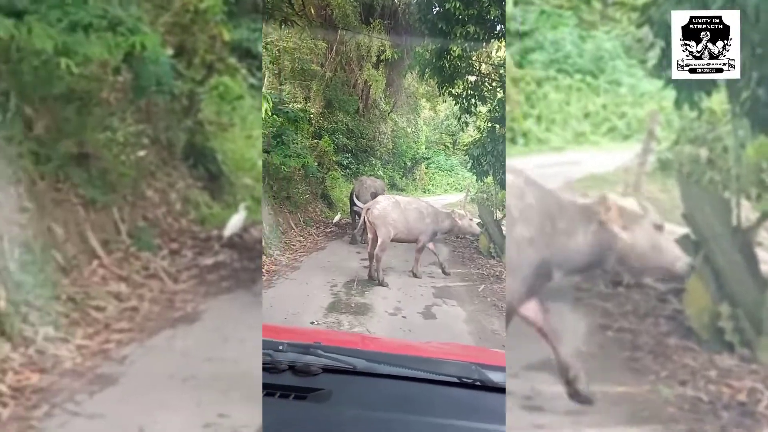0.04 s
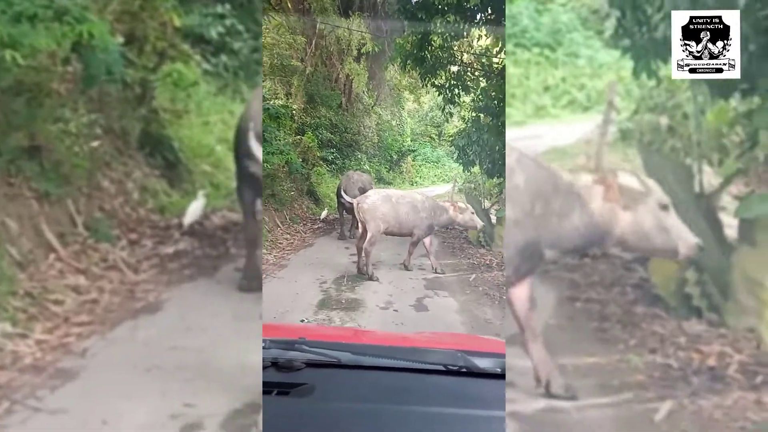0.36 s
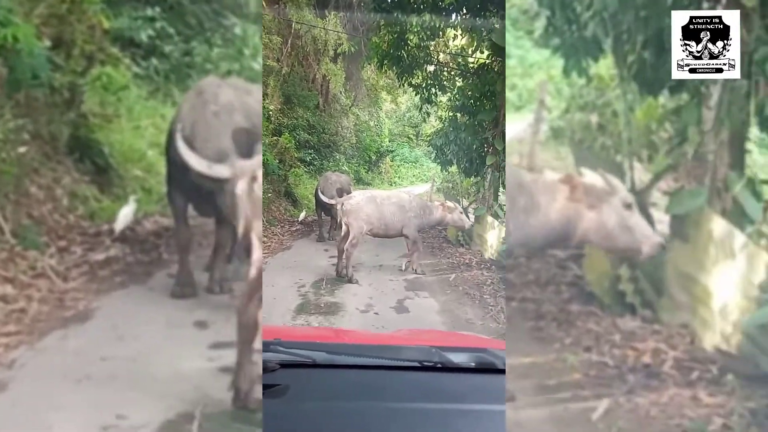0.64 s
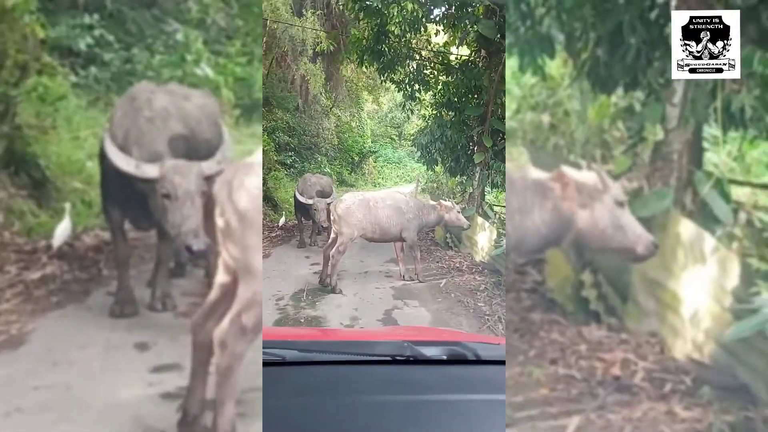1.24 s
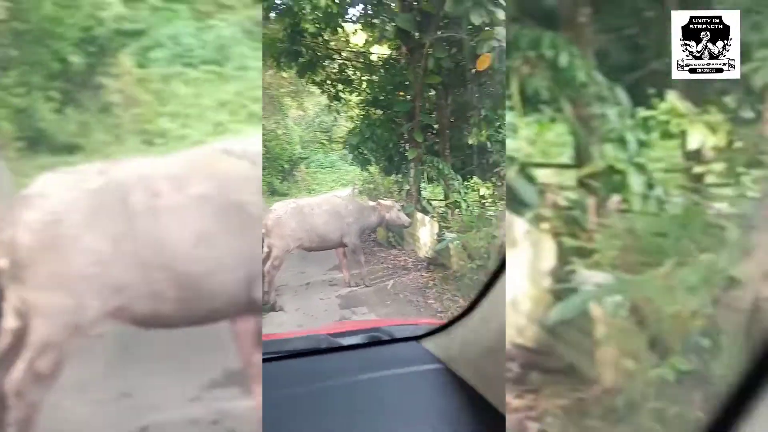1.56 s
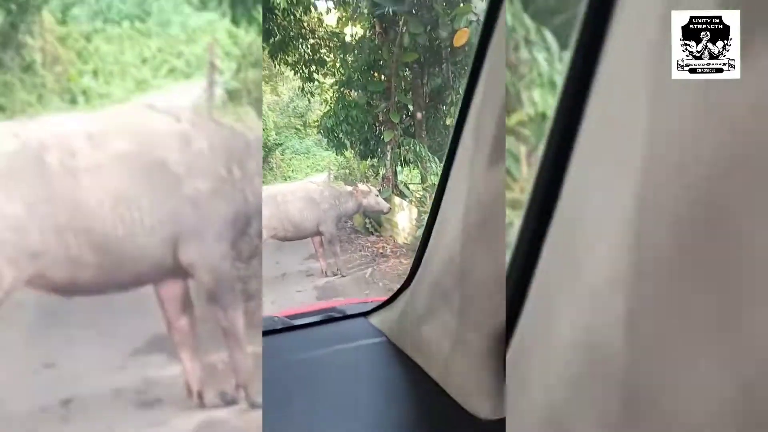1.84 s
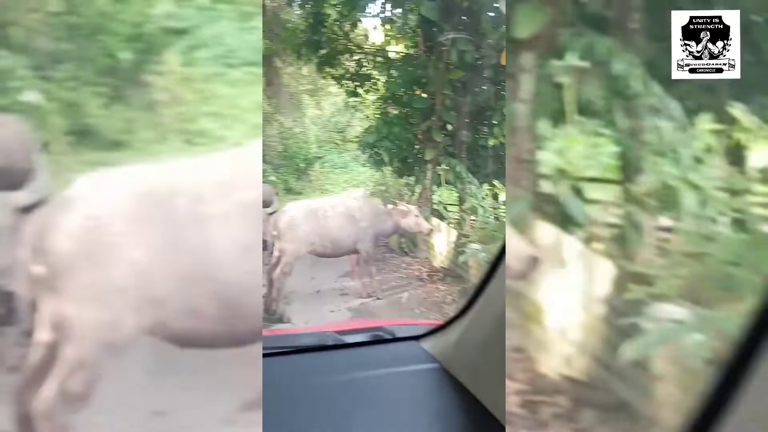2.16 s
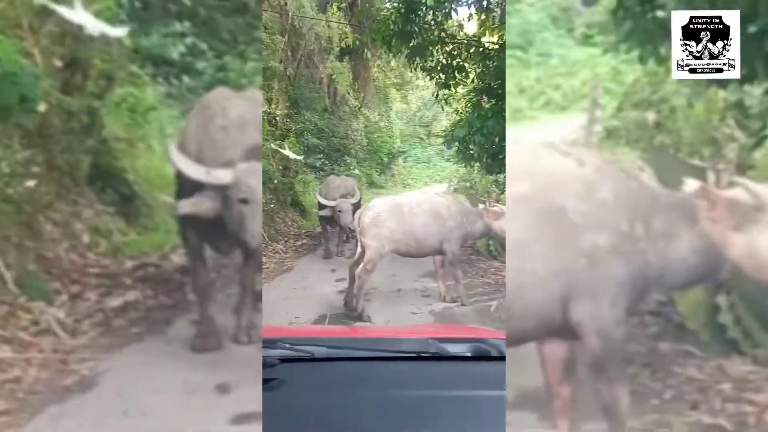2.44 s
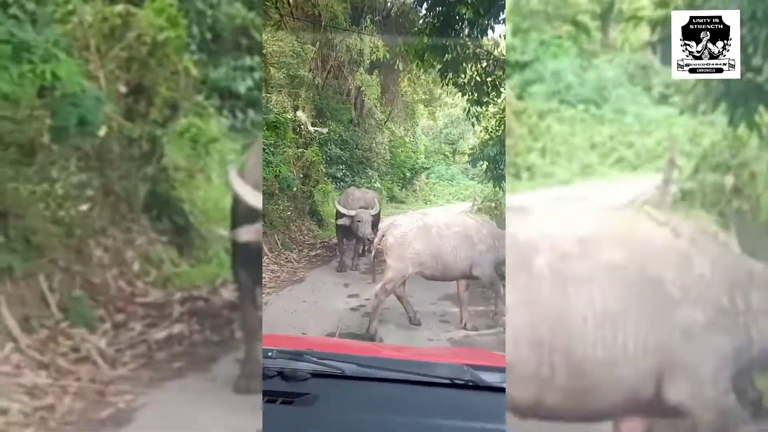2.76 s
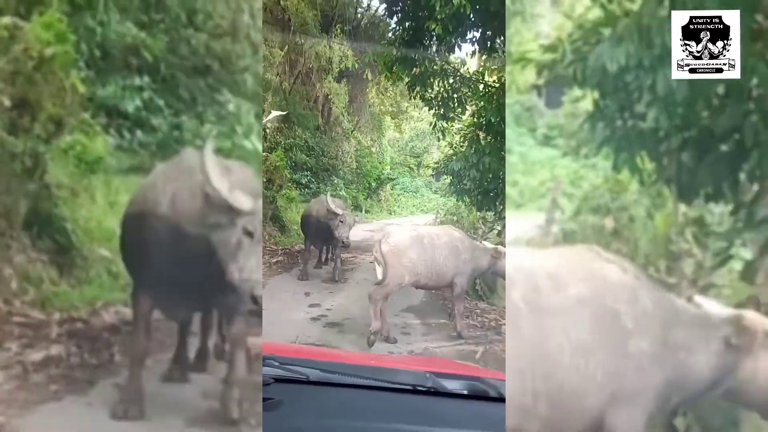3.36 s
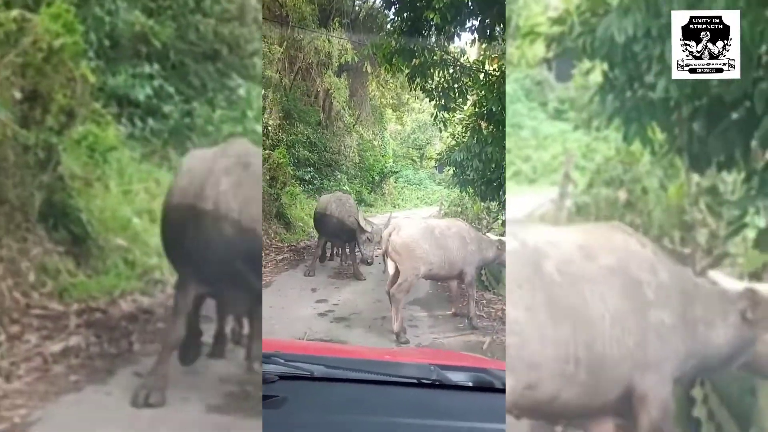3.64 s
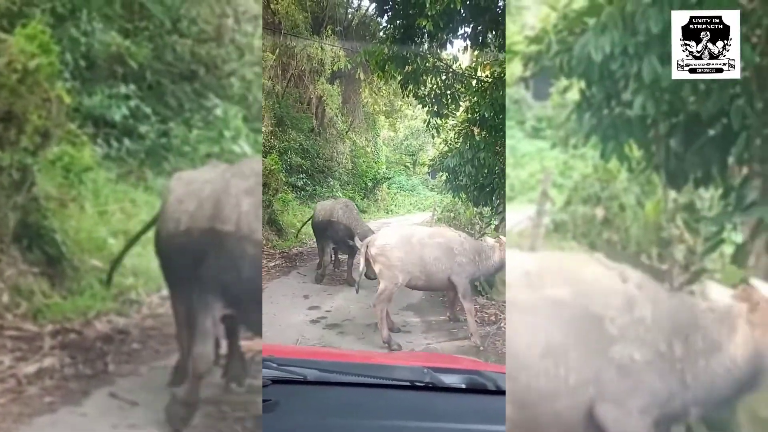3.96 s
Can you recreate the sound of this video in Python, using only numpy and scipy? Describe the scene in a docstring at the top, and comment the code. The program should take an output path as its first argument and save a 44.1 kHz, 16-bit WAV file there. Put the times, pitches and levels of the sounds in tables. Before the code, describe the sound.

Low engine rumble inside a slowly moving car, with rushing air and a few dull thuds.

```python
"""A car's engine hums low, heard from inside as it creeps along a village road; the cabin booms with it.
Air rushes through the dashboard vents and brightens while the microphone is turned aside.
Soft bumps shake the body: a few faint ones early, then a stronger one and a short run near the end.
A thin whistle, ticks of plastic trim and the rustle of a hand and sleeve come and go."""
import sys
import numpy as np
from scipy import signal
from scipy.fft import rfft, irfft
from scipy.io import wavfile
from scipy.ndimage import uniform_filter1d

SR = 44100
rng = np.random.default_rng(int(sys.argv[2]) if len(sys.argv) > 2 else 0)


def unload_wav(signal):
    """Save mono or channel-first audio to the path in sys.argv[1] as 16-bit WAV at rate SR, clipped to [-1, 1]."""
    wavfile.write(
        sys.argv[1],
        SR,
        np.round(np.clip(np.atleast_2d(signal).T, -1, 1) * 32767).astype(np.int16),
    )


N = 176400
T, HZ = np.arange(N) / SR, np.fft.rfftfreq(N, 1 / SR)

# how fast the engine runs (time [s], cycle rate [Hz])
ENGINE_SPEED = [(0, 22.77), (1.5, 22.12), (3, 21.99), (4, 21.98)]
# tones in the hum (multiple of the cycle rate, relative level [dB])
ENGINE_TONES = [(2, -61), (3, -55.5), (4, -47.5), (6, -55), (9, -50)]
# how the hum rises and falls (time [s], gain [dB])
ENGINE_GAIN = [(0, -10), (.8, 4), (1.4, -3), (2.2, -1), (3.0, 2), (4, 7.5)]
# the rumble's colour: how strong its lows and highs are (frequency [Hz], relative level [dB])
RUMBLE_COLOUR = [(20, -33), (33, -30.5), (45, -18), (70, -22), (100, -3.5), (125, 1), (160, -1.5),
                 (225, -2.5), (310, -10.5), (450, -24.5), (900, -55.5), (3000, -110)]
# pitches at which the cabin air booms (frequency [Hz], width [Hz], boost [dB])
CABIN_BOOMS = [(131, 30, 2), (191.7, 24, 3.5), (246, 27, 3.5)]
# loudness of the rumble (time [s], level [dB])
RUMBLE_LEVEL = [(0, -33), (.28, -37), (.46, -38.5), (.75, -35), (1.2, -38.5), (2.1, -38), (2.8, -37.5),
                (3.1, -36), (3.25, -34.5), (3.4, -37), (3.72, -36.5), (3.82, -29.5), (4, -28)]
# one narrow boom that drones (frequency [Hz], relative level [dB])
DRONE_COLOUR = [(120, -58.5), (178, -13), (195, 1.5), (208, -9), (300, -63.5), (1000, -140)]
# loudness of the drone (time [s], level [dB])
DRONE_LEVEL = [(0, -50.5), (.25, -35), (.45, -53.5), (.75, -40), (1.0, -38.5), (1.2, -49), (1.4, -38),
               (2.0, -45.5), (2.25, -42.5), (2.7, -48), (3.1, -48), (4, -41.5)]
# vent air (frequency [Hz], relative level facing ahead [dB], relative level turned aside [dB])
AIR_COLOUR = [(100, -13.5, -22), (326, -6, 7), (442, 0.5, 0), (523, -1.5, -0.5), (725, -0.5, 5),
              (833, -7, -5), (1400, -8.5, -9.5), (2000, -11.5, -8), (2630, -13, -7), (2990, -12.5, -7.5),
              (3715, -14.5, -10), (4605, -23.5, -15), (4790, -26.5, -31), (5060, -49.5, -40),
              (5200, -45, -41), (5440, -52, -42.5), (8000, -75, -67)]
# where the ducts ring (frequency [Hz], width [Hz], boost facing ahead [dB], boost turned aside [dB])
DUCT_RINGS = [(558, 18, -5, 0), (602.6, 77, 7.5, 1.5), (676.4, 56, 6, 3), (952, 84, 4, 0.5),
              (1145, 47, 5, 4.5), (1556, 65, 11, 6.5), (1716, 74, 3.5, 10.5), (1877, 23, 5, 7),
              (2200, 160, 6.5, 1.5), (2753, 56, -0.5, 5), (2900, 62, 3.5, 3.5), (3264, 120, -8, -1),
              (3315, 90, 5.5, -9), (4136, 110, 5.5, -6), (4195, 130, -6.5, -8)]
# how far the microphone is turned aside (time [s], share [0-1])
MIC_TURN = [(0, 0.05), (.4, 0.03), (.8, 0.1), (1.3, 0.14), (1.55, 0.52), (1.8, 0.97), (2.1, 0.7),
            (2.35, 0.5), (2.55, 0), (4, 0)]
# loudness of the whistle (time [s], level [dB])
WHISTLE_LEVEL = [(0, -78), (.4, -73), (.75, -82), (1.2, -72), (2.1, -82), (2.75, -77.5), (3.3, -76),
                 (3.6, -80.5), (4, -80)]
# the body's deep shudder (frequency [Hz], relative level [dB])
SHUDDER_COLOUR = [(20, -21), (33, 5.5), (48, -10), (66, 12.5), (100, 10.5), (150, -3), (300, -19.5),
                  (700, -69), (2500, -120)]
# loudness of the shudder (time [s], level [dB])
SHUDDER_LEVEL = [(0, -47), (.45, -52), (.8, -50), (1.2, -58.5), (2.6, -63), (2.95, -53), (3.15, -46),
                 (3.22, -41), (3.3, -46), (3.45, -52), (3.74, -48), (3.8, -36), (3.92, -36), (4, -37)]
# rubbing cloth (frequency [Hz], relative level [dB])
SLEEVE_COLOUR = [(500, -27.5), (1100, -3), (1400, 1.5), (2000, -3.5), (2900, 0), (3700, 0.5), (4600, -8),
                 (5100, -24.5), (7000, -48.5)]
# loudness of the rubbing, before its flutter (time [s], level [dB])
SLEEVE_LEVEL = [(0, -75), (1.0, -61), (1.45, -63), (1.6, -55), (1.85, -49), (2.05, -57), (2.25, -47.5),
                (2.33, -60), (2.6, -75.5), (4, -74.5)]
# shifts of the hand (start [s], peak level [dB], rise time [s])
GRIP_RUSTLES = [(.108, -72, .012), (1.655, -76, .02), (1.792, -64.5, 0.013), (2.125, -70, 0.021),
                (2.238, -66, .011), (3.305, -72, .012), (3.885, -73, 0.014)]
# the hand's rustle (frequency [Hz], relative level [dB])
GRIP_COLOUR = [(3000, -13), (5500, 5), (8000, -12.5), (10300, 1.5), (12500, -0.5), (15000, 0)]
# soft bumps (start [s], peak level [dB], rough pitch [Hz], rise time [s])
SOFT_BUMPS = [(.203, -29, 228.5, 0.016), (0.789, -27, 132, 0.0098), (.934, -29.5, 192, 0.0076),
              (3.165, -24, 265, 0.0098), (3.176, -18, 136, 0.011), (3.203, -26, 183, 0.015),
              (3.403, -31, 170, 0.0053), (3.775, -19, 116.4, 0.012), (3.806, -16, 169, 0.0064),
              (3.824, -19.5, 286.7, 0.01), (3.865, -17.5, 98, 0.013), (3.911, -17.5, 97, 0.013),
              (3.950, -20, 108, 0.0099)]
# ticks of the trim (start [s], peak level [dB], rise time [s])
TRIM_TICKS = [(1.798, -42, 0.0022), (2.248, -47, 0.001), (3.308, -48, 0.003)]
# the ring of the plastic (frequency [Hz], relative level [dB])
TICK_COLOUR = [(300, -19), (1400, -3), (3300, -1), (4050, 10.5), (4700, 3), (5400, -12), (8000, -38),
               (11000, -31), (15000, -30)]
# drumming panels (frequency [Hz], relative level [dB])
PANEL_COLOUR = [(50, -50), (130, -4.5), (200, -1.5), (260, -1), (300, 2.5), (330, -9), (370, -19.5),
                (600, -17), (900, -44.5), (2500, -110)]
# loudness of the drumming (time [s], level [dB])
PANEL_LEVEL = [(0, -82), (3.15, -71), (3.172, -30.5), (3.195, -26.5), (3.24, -59), (3.74, -64), (3.78, -29),
               (3.83, -26), (3.89, -30.5), (3.93, -35), (4, -42)]
# microphone hiss (frequency [Hz], relative level [dB])
HISS_COLOUR = [(1000, 0), (5000, 1), (6400, 6), (7500, 1.5), (9000, -2.5), (11000, -0.5), (13000, 4),
               (15500, 2)]
# loudness of the hiss (time [s], level [dB])
HISS_LEVEL = [(0, -73), (1.5, -75), (2.9, -75), (3.3, -76), (4, -76)]


def amp(db):
    """Turns decibels into a number to multiply by."""
    return 10 ** (np.asarray(db) / 20)


def unit(x):
    """Scales a signal to an average strength (rms) of 1."""
    return x / np.sqrt(np.mean(x ** 2) + 1e-20)


def curve(points):
    """Joins (time, value) points with straight lines."""
    return np.interp(T, *np.transpose(points))


def colour(points, column=1):
    """Joins a colour table's points into a level in dB for every frequency."""
    table = np.array(points, float)
    return np.interp(np.log(HZ + 1), np.log(table[:, 0]), table[:, column])


def boosts(rows, column=2):
    """Bell-shaped peaks or dips, in dB, to add to a colour."""
    return sum(row[column] * 2 ** -((2 * (HZ - row[0]) / row[1]) ** 2) for row in rows)


def noise(colour_db):
    """Noise of strength 1 with the given colour."""
    return unit(irfft(rfft(rng.standard_normal(N)) * amp(colour_db), N))


def drift(rate_hz):
    """A random wander of strength 1; a higher rate wanders faster."""
    return unit(irfft(rfft(rng.standard_normal(N)) * np.exp(-(HZ / rate_hz) ** 2), N))


def swell(start, rise):
    """A loudness shape that reaches 1 after its rise time, then dies away."""
    age = np.maximum(T - start, 0) / rise
    return age * np.exp(1 - age)


def engine():
    """A slightly unsteady engine hums in a few low tones, each throbbing by itself."""
    speed = curve(ENGINE_SPEED) * (1 + 0.0088 * drift(rate_hz=2.6))
    cycles = np.cumsum(speed) / SR
    hum = 0
    for multiple, db in ENGINE_TONES:
        throb = amp(4.5 * drift(rate_hz=6.2))
        tone = np.sin(2 * np.pi * (multiple * cycles + rng.random()))
        hum += amp(db) * unit(throb * tone)
    return amp(curve(ENGINE_GAIN)) * hum


def cabin():
    """Engine and tyres shake the cabin air, which booms at a few pitches; one drones in swells."""
    rumble = amp(curve(RUMBLE_LEVEL)) * noise(colour(RUMBLE_COLOUR) + boosts(CABIN_BOOMS))
    drone = amp(curve(DRONE_LEVEL)) * noise(colour(DRONE_COLOUR))
    return rumble + drone


def reflections(depth_db=2, spacing_hz=41):
    """Sound bouncing off glass and trim leaves fine peaks and dips, in dB, in the air's colour."""
    jagged = rng.standard_normal(len(HZ))
    return depth_db * unit(uniform_filter1d(jagged, round(spacing_hz / HZ[1])))


def vents():
    """Air rushes through ringing ducts; its colour depends on where the microphone points."""
    ahead = amp(-39) * noise(colour(AIR_COLOUR) + boosts(DUCT_RINGS) + reflections())
    aside = amp(-39.5) * noise(colour(AIR_COLOUR, column=2) + boosts(DUCT_RINGS, column=3) + reflections())
    turn = curve(MIC_TURN)
    flutter = amp(0.79 * drift(rate_hz=18.4))
    return (np.sqrt(1 - turn) * ahead + np.sqrt(turn) * aside) * flutter


def whistle(pitch_hz=5213, width_hz=43):
    """A thin, rough whistle comes and goes above the rush of air."""
    fuzz = drift(width_hz) + 1j * drift(width_hz)  # blurs both loudness and pitch
    tone = (fuzz * np.exp(2j * np.pi * pitch_hz * T)).real
    flicker = 1 + .7 * np.tanh(2 * drift(rate_hz=10))
    return amp(curve(WHISTLE_LEVEL)) * unit(tone * flicker)


def shudder():
    """The car's body gives a deep shudder, strongest after the bumps."""
    return amp(curve(SHUDDER_LEVEL)) * noise(colour(SHUDDER_COLOUR))


def sleeve():
    """A sleeve rubs unevenly as the arm turns."""
    flutter_db = 3 * drift(rate_hz=38)
    return amp(curve(SLEEVE_LEVEL) + flutter_db) * noise(colour(SLEEVE_COLOUR))


def grip():
    """A hand shifts its grip with light, grainy rustles."""
    grains = unit(amp(2 * drift(rate_hz=600)) * noise(colour(GRIP_COLOUR)))
    return sum(amp(db) * swell(start, rise) for start, db, rise in GRIP_RUSTLES) * grains


def bumps(sag=0.093, roughness=0.14, rough_hz=58):
    """Each bump shakes the body for a few rough cycles that sag in pitch."""
    thuds = 0
    for start, db, hz, rise in SOFT_BUMPS:
        age = np.maximum(T - start, 0) / rise
        pitch = hz * (1 + sag * (2 * np.exp(-age) - .5))
        cycles = np.cumsum(pitch * (age > 0)) / SR
        fuzz = roughness * (drift(rough_hz) + 1j * drift(rough_hz))
        tone = ((1 + fuzz) * np.exp(2j * np.pi * cycles)).imag
        thuds += amp(db) * swell(start, rise) ** 2 * tone
    return thuds


def ticks():
    """Plastic trim gives small dry ticks, each with a short ring."""
    loudness = sum(amp(db) * swell(start, rise) for start, db, rise in TRIM_TICKS)
    return loudness * noise(colour(TICK_COLOUR))


def panels():
    """The late bumps set the car's panels drumming."""
    return amp(curve(PANEL_LEVEL)) * noise(colour(PANEL_COLOUR))


def scene():
    """Everything heard from the front seat, in one channel."""
    background = engine() + cabin() + vents() + whistle() + shudder()
    return (background + sleeve() + grip() + bumps() + ticks() + panels())[None]


def record(dry, cutoff_hz=15500):
    """The microphone adds a faint hiss, and the very highest treble is cut off."""
    hiss = amp(curve(HISS_LEVEL)) * noise(colour(HISS_COLOUR))
    treble_cut = signal.firwin(511, cutoff_hz, window=("kaiser", 9), fs=SR)
    return signal.oaconvolve(dry + hiss, treble_cut[None], "same")


dry = scene()
out = record(dry)
unload_wav(out)
```